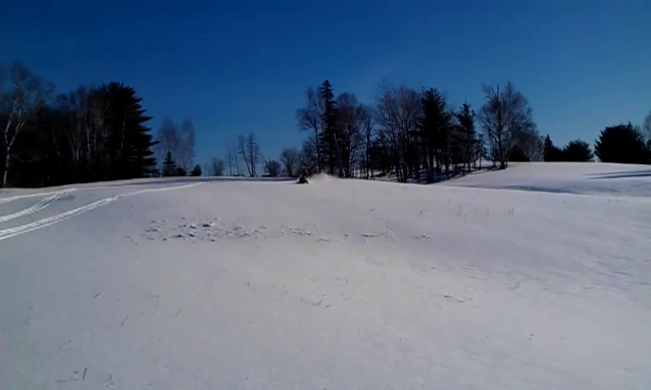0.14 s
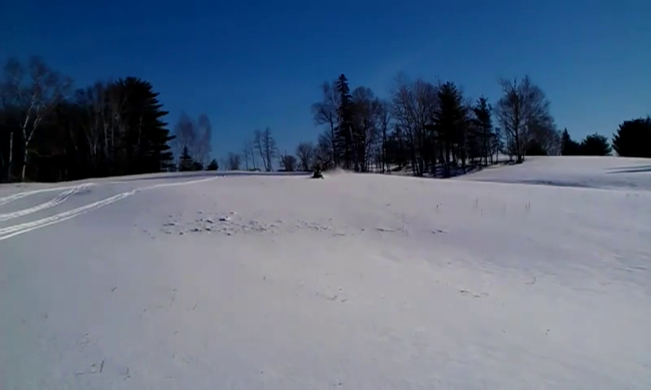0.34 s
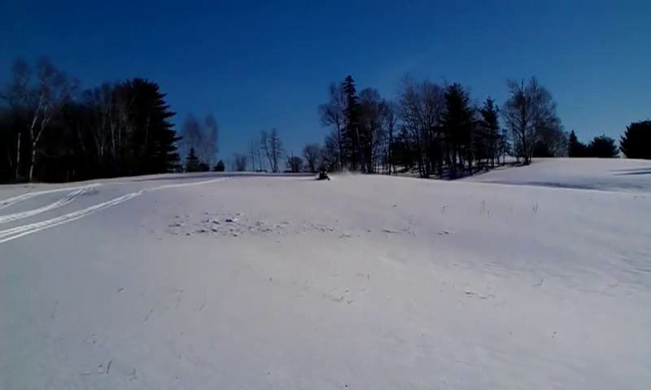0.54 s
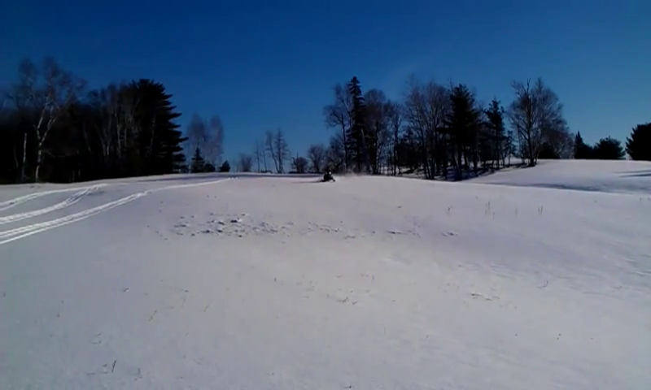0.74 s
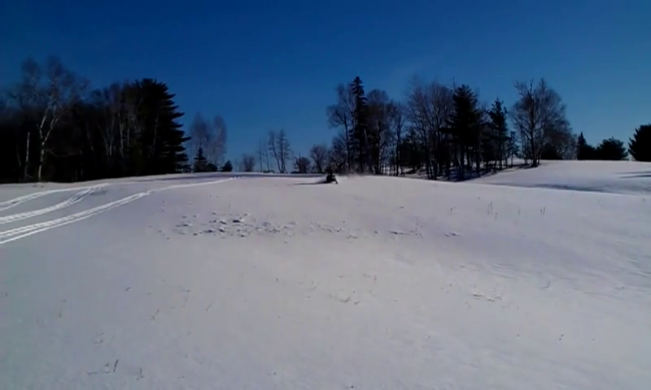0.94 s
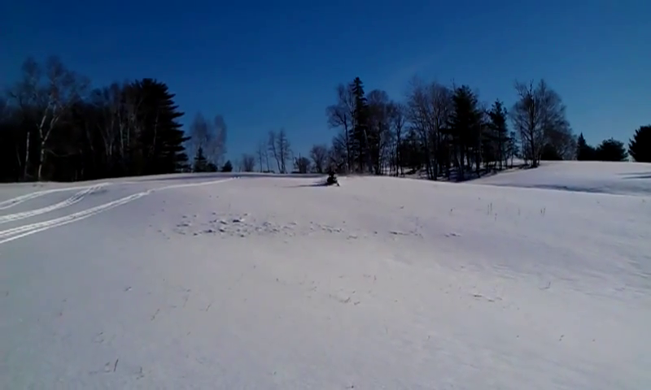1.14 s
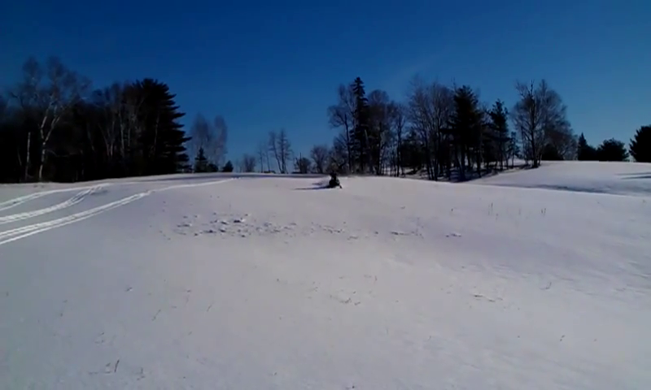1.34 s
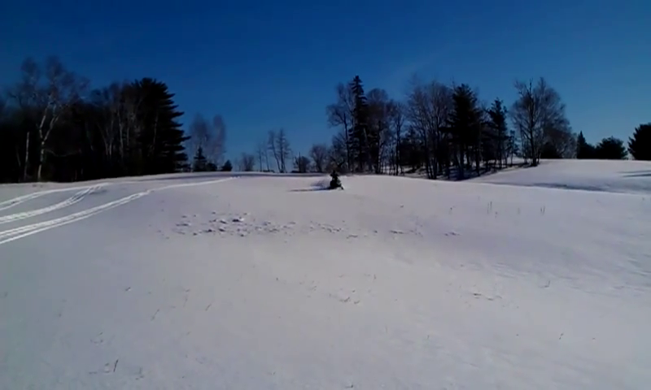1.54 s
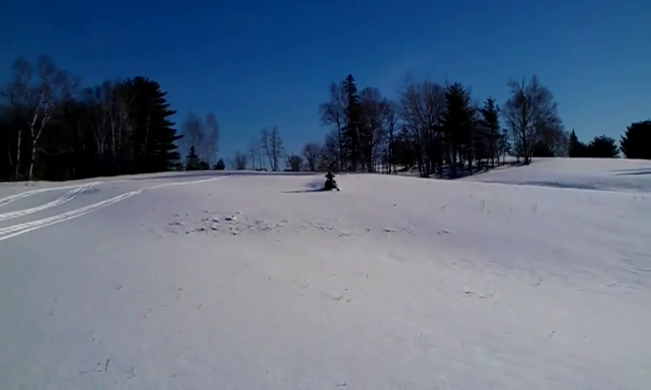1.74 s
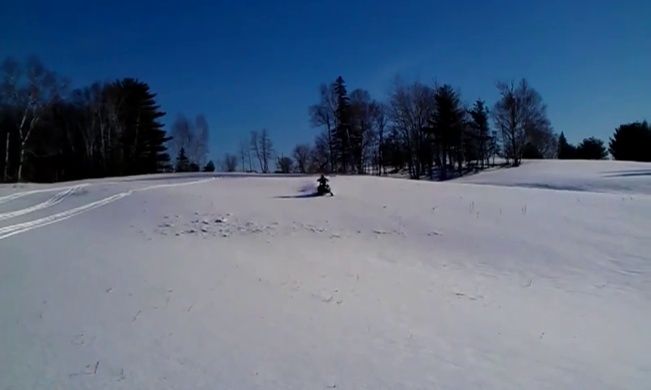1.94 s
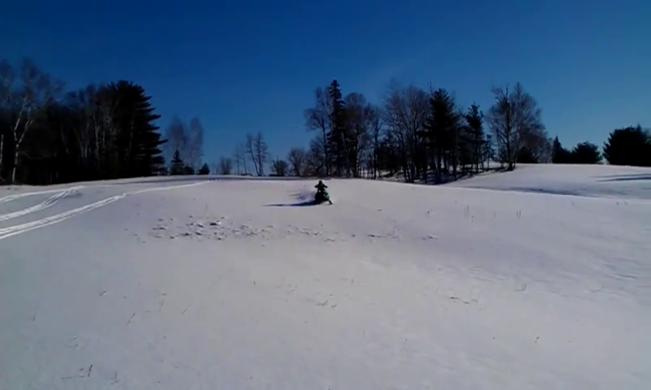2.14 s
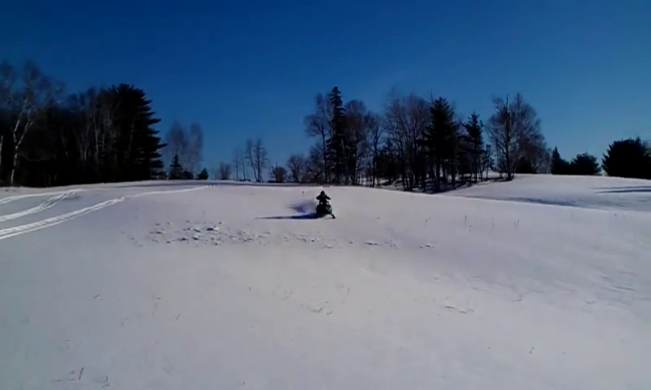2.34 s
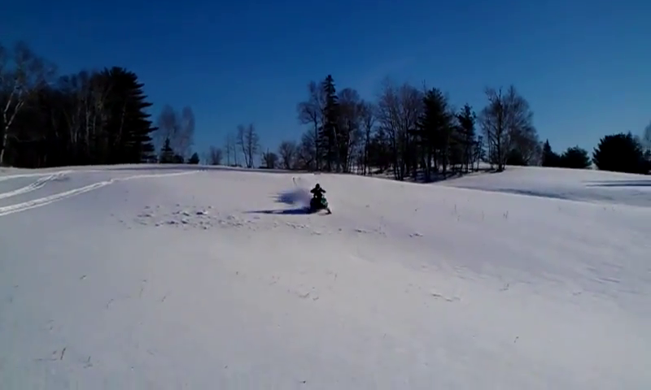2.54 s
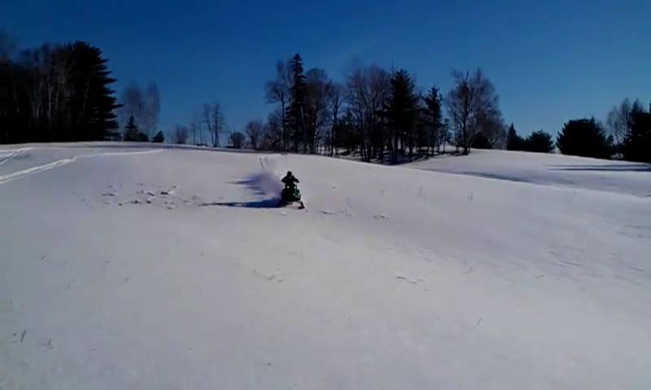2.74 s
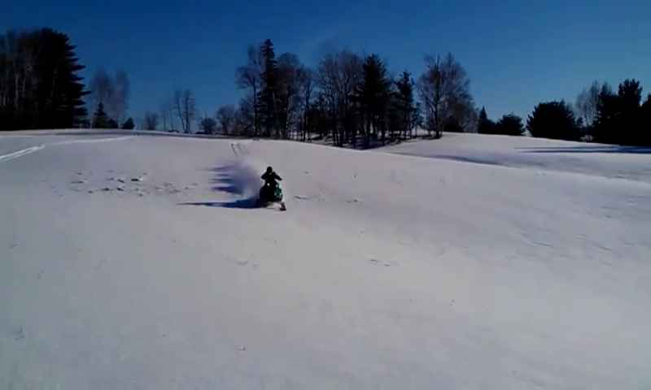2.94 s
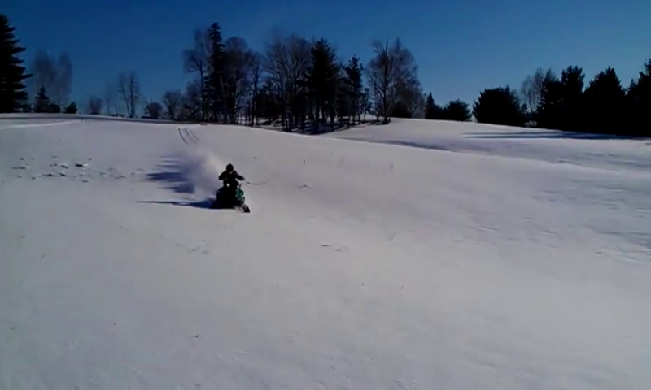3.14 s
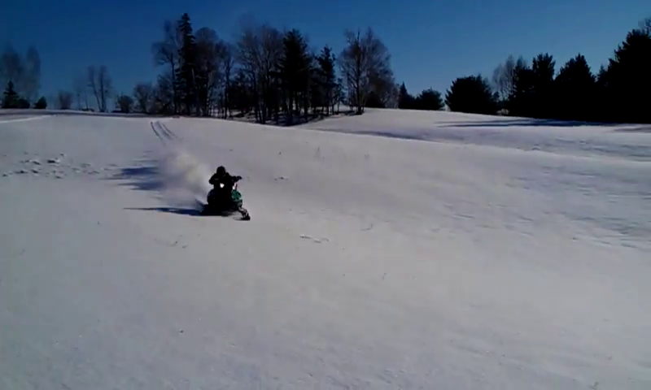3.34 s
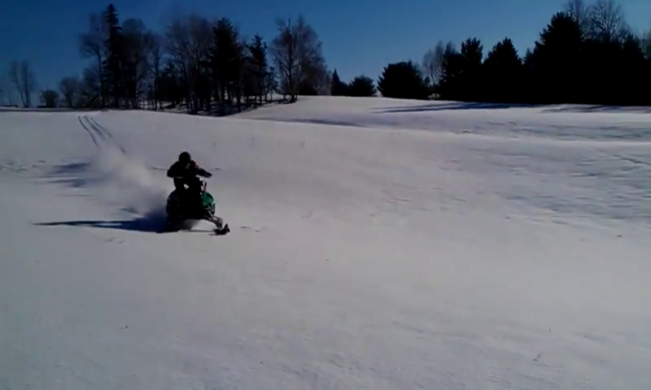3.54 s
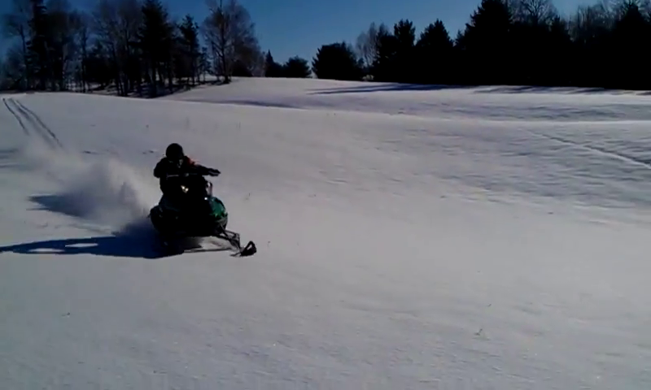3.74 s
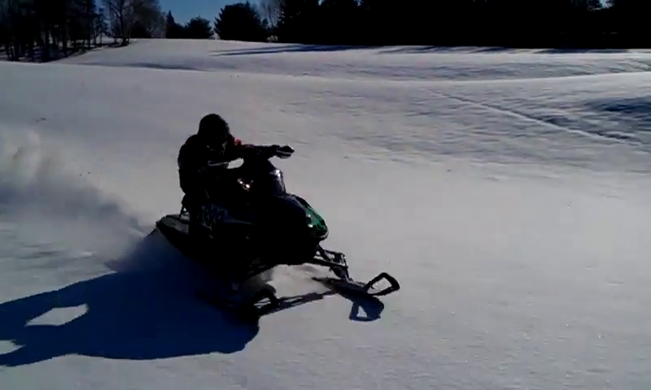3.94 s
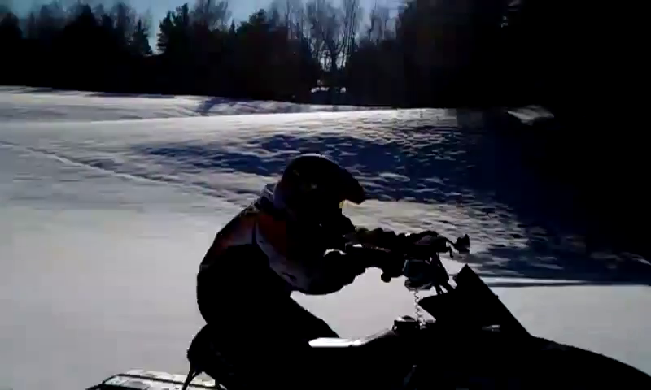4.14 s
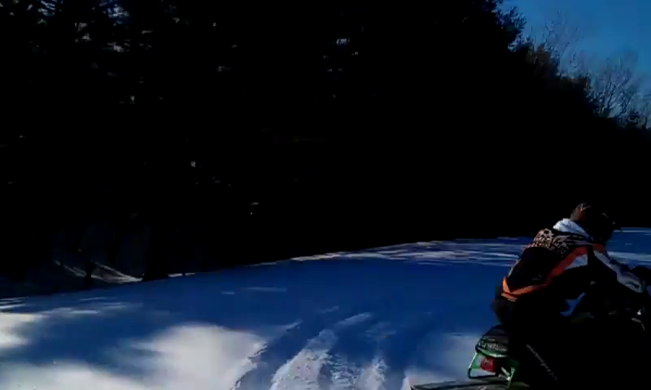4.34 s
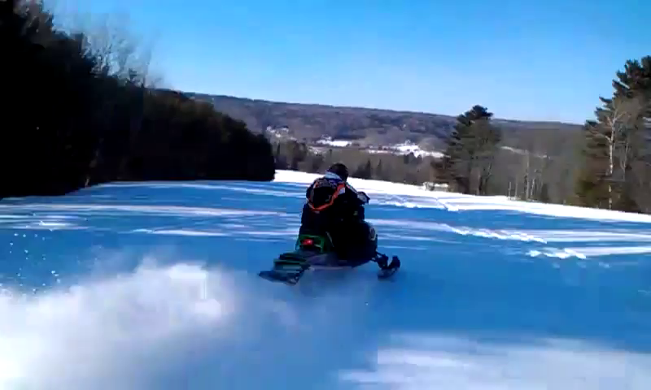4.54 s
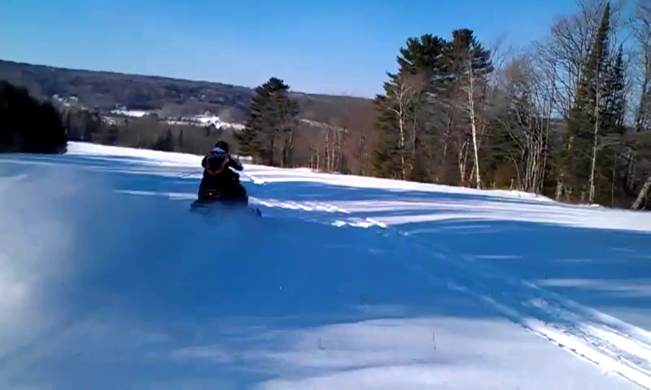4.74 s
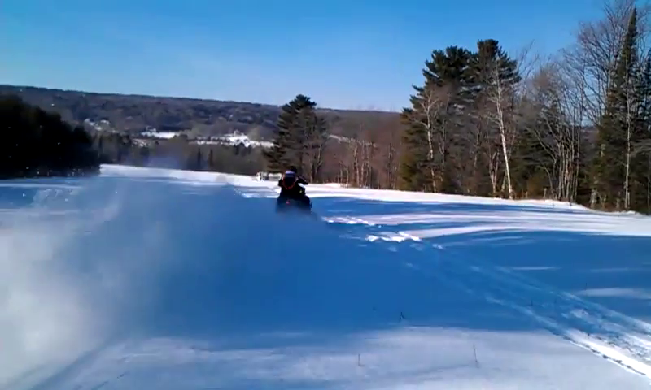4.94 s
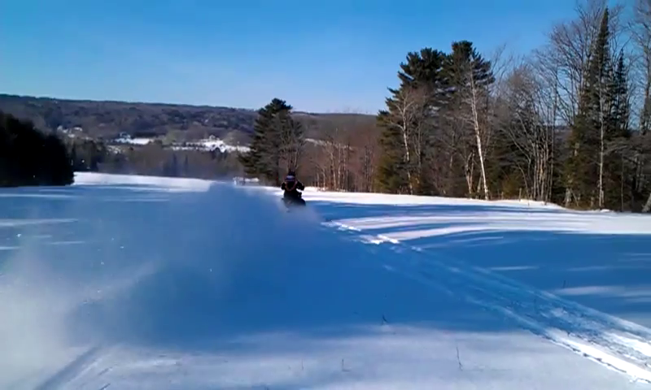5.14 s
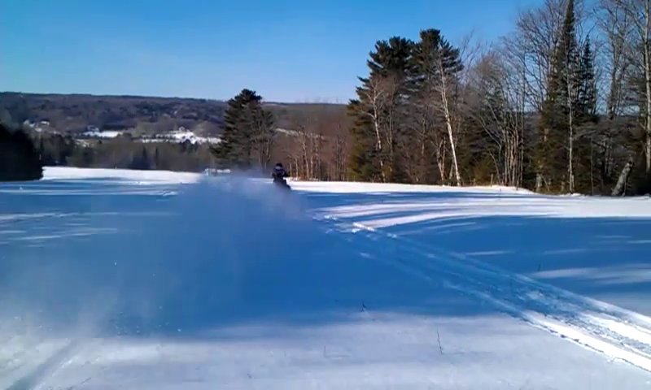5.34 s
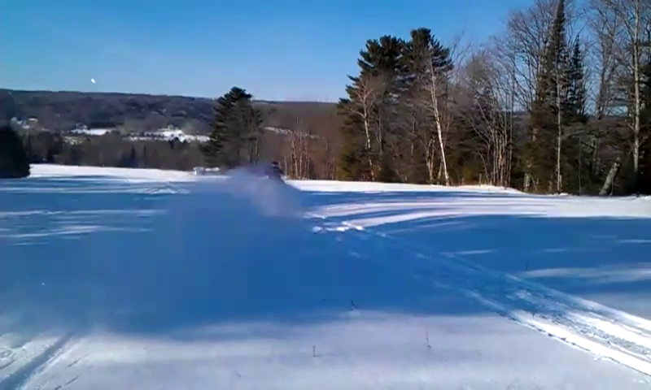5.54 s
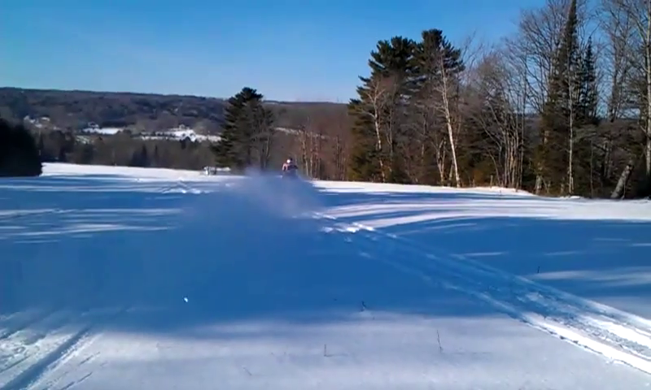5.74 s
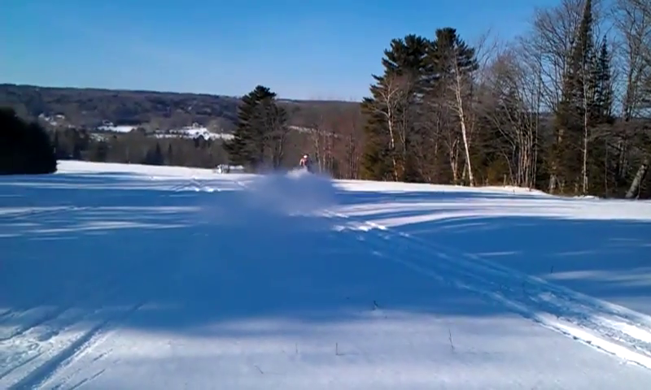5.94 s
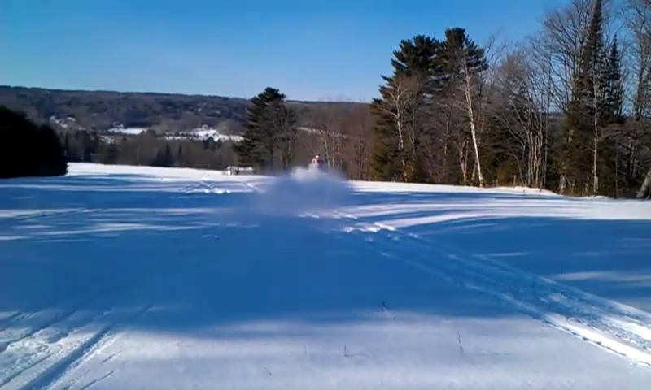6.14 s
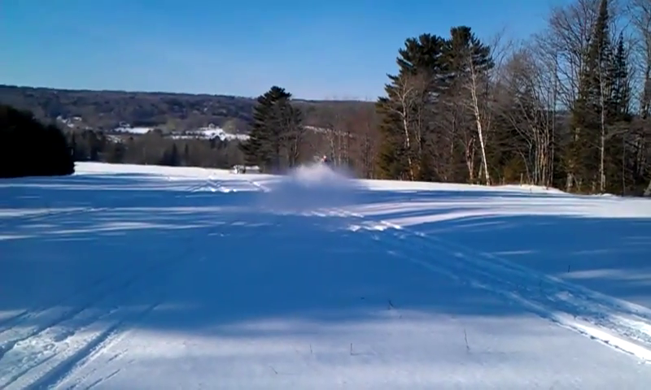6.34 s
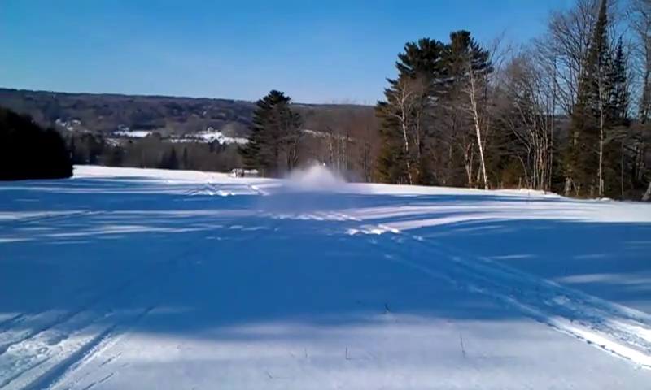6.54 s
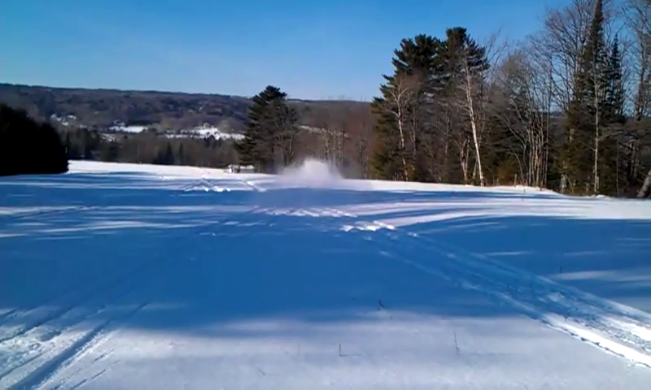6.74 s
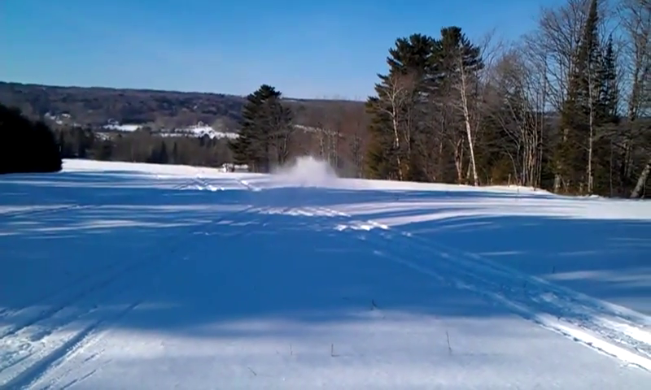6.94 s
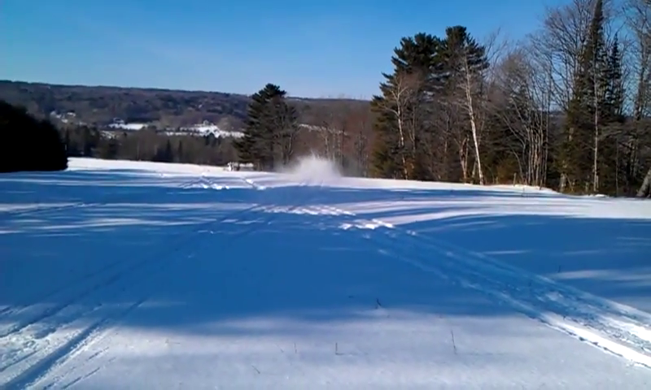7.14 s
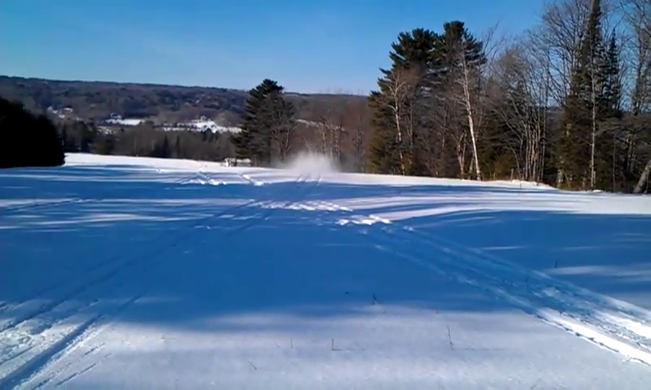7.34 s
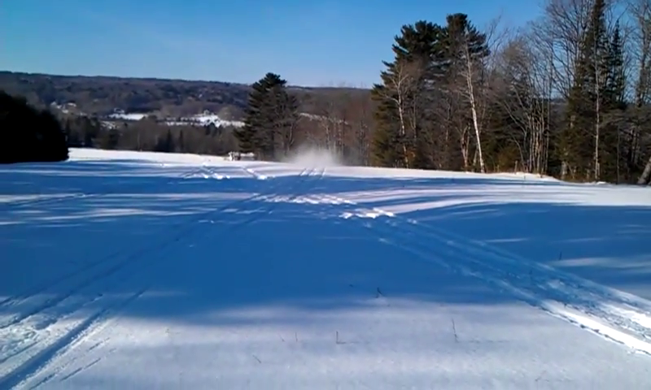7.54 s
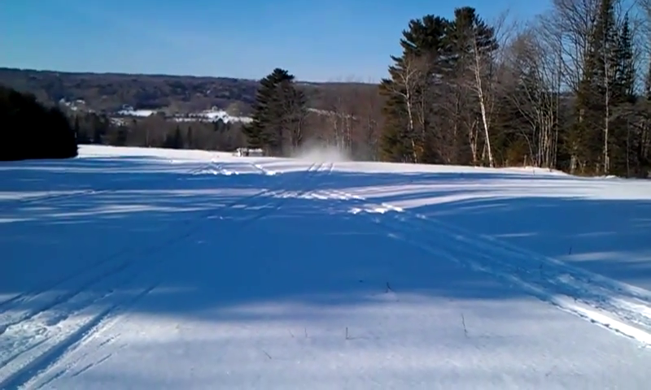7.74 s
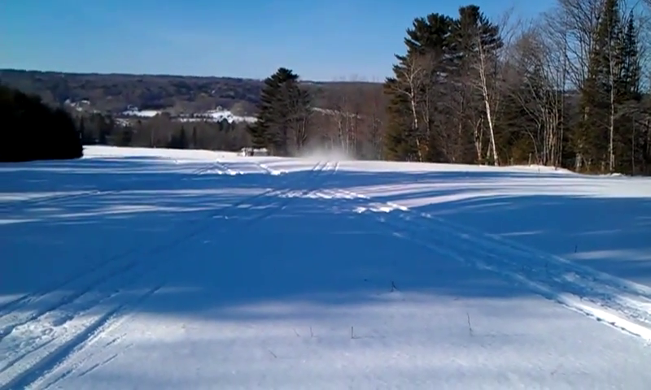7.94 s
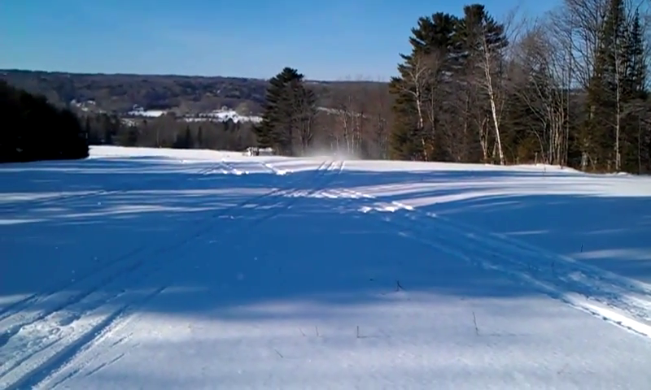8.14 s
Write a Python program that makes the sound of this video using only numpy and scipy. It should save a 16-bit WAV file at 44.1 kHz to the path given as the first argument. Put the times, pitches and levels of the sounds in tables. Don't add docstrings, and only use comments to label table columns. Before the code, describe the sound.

Outdoors on an open snowy field, one microphone is buffeted by low wind puffs. Far ahead a two-stroke snowmobile blips and stutters, then holds a raspy full-throttle scream as it approaches. It rushes by within a few metres, pitch falling sharply, with a brief spray of snow and track rumble. Behind, the throttle drops, surges once and sinks into a fading, duller burble.

```python
import sys
import numpy as np
from scipy import signal
from scipy.fft import rfft, irfft, next_fast_len
from scipy.io import wavfile
from scipy.ndimage import uniform_filter1d

SR = 44100
rng = np.random.default_rng(int(sys.argv[2]) if len(sys.argv) > 2 else 0)


def level_to_linear(level):
    exponent = np.asarray(level, float) / 20
    return 10 ** exponent


def store_pcm(level_fs):
    pcm = np.round(np.clip(level_fs, -1, 1) * 32767).astype(np.int16)
    wavfile.write(sys.argv[1], SR, np.atleast_2d(pcm).T)


N = 361355

# time in seconds, level in dB.
WIND_LEVEL = [(0.0, -42), (0.2, -35.5), (0.5, -39), (0.72, -53), (0.93, -43.5), (1.6, -45.5), (2.07, -41),
              (2.33, -46), (2.55, -38.5), (3.2, -69), (4.05, -63), (4.31, -42), (4.55, -61), (5.11, -42.5),
              (5.95, -59.5), (7.12, -62.5), (7.69, -51.5), (8.19, -56.5)]
# frequency in Hz, level in dB per Hz.
BUFFET_COLOUR = [(12, -30), (25, -10), (50, 3.5), (110, -1), (200, -11), (350, -11.5), (600, -15.5),
                 (1200, -90)]
# time in seconds, peak in dB.
EDDIES = [(0.055, -28), (0.094, -22), (0.13, -20), (0.139, -17), (0.204, -22), (0.228, -22), (0.252, -15.5),
          (0.301, -15.5), (0.37, -17.5), (0.386, -14), (0.463, -14.5), (0.507, -18), (0.622, -15.5),
          (0.638, -18), (0.691, -21.5), (0.887, -24), (0.922, -18), (1.4, -17.5), (1.413, -16.5),
          (1.453, -22), (1.684, -25), (1.807, -36), (1.882, -27), (1.943, -15), (2.009, -20), (2.043, -33),
          (2.573, -21), (2.622, -14.5), (2.709, -17)]
# time in seconds, level in dB.
SELF_NOISE_LEVEL = [
    (0, -70),
    (6.7, -70),
    (7.0, -61),
]
# frequency in Hz, level in dB per Hz.
SPRAY_COLOUR = [(300, -30), (450, -5), (560, 3), (720, -4), (1000, -24)]
# time in seconds, lug rate at the sled in Hz, tone in dB.
LUGS = [(2.4, 279.4, -46), (3.2, 315.8, -51), (3.9, 321.8, -36.5), (4.3, 345.6, -33), (4.52, 330.4, -25.5),
        (4.75, 344.7, -30), (5.1, 321.7, -34), (5.6, 285, -44), (5.9, 284, -52), (6.35, 316.9, -39),
        (6.6, 322, -42.5), (7.08, 283, -50.5), (7.6, 242.8, -73)]
# frequency in Hz, level in dB per Hz.
RUMBLE_COLOUR = [(35, -59), (70, -21), (150, -10), (300, -0.5), (520, -5), (700, -10), (1100, -37)]
# centre in seconds, length in seconds, tone in dB, overtone in dB.
CHAIN_SWELLS = [
    (5.6, 0.13, -29.5, -49),
    (7.199, .16, -56, -50),
    (7.442, 0.19, -42, -56),
]
# start in seconds, crank turns aimed at in Hz, lag in seconds.
THROTTLE_MOVES = [(0.0, 112, 0.15), (.08, 90.24, .12), (.22, 150.1, 0.33), (.47, 115.6, 0.056),
                  (.55, 165, 0.41), (.71, 138, .08), (.81, 133.5, .04), (.9, 100, .11), (1.08, 150, .45),
                  (1.17, 123.9, .12), (1.25, 190, 0.44), (1.37, 141.7, 0.39), (4.98, 101.4, 0.15),
                  (5.46, 114.2, .13), (5.66, 106.9, 0.16), (5.9, 198.6, 1.17), (6.24, 142.4, 0.089),
                  (6.55, 139.1, 0.19), (6.73, 99.3, 0.14), (7.1, 90.1, 0.59), (7.981, 102.5, 0.42)]
# centre in seconds, length in seconds, whine loss in dB.
MISFIRE_EVENTS = [
    (0.165, 0.051, 6),
    (0.494, 0.027, 6.5),
    (.945, 0.019, 4.5),
    (1.05, 0.016, 6),
    (5.354, 0.012, 7.5),
    (5.46, 0.0096, 1.5),
    (5.736, 0.0096, 6),
]
# time in seconds, roar in dB.
ROAR_LEVEL = [(0, -24), (.45, -21.5), (.65, -22.5), (.8, -21), (1.3, -20), (1.55, -19.5), (2.1, -21.5),
              (2.45, -18), (3.2, -19.5), (3.6, -17), (4.25, -21.5), (4.6, -19.5), (4.93, -18.5),
              (5.05, -18), (5.62, -16.5), (5.78, -18.5), (6.4, -22), (6.7, -27), (8.19, -23)]
# multiple of crank turns, level in dB.
ORDERS_OVER_RISE = [(1, -23), (2, -10.5), (3, -22), (4, -2), (5, -20), (6, 4), (7, -30), (8, -17), (9, -14),
                    (10, -7), (11, -3), (12, -2), (13, -7), (14, -2), (15, -6), (16, 2), (17, 3.5),
                    (18, -4), (19, -24), (20, -6), (21, -1), (22, 2.5)]
ORDERS_AHEAD = [(1, -25.5), (2, -16), (3, -18.5), (4, -3.5), (5, -11), (6, 6.5), (7, -27), (8, -10),
                (9, -56), (10, 3), (11, -7), (12, -3), (13, -19), (14, -3), (15, -2), (16, 0.5), (17, 1),
                (18, -7), (19, -28), (20, -7), (21, -33), (22, -2)]
ORDERS_CLOSE = [(1, -20), (2, -18), (3, -32), (4, -6.5), (5, -4), (6, -0.5), (7, -27), (8, -3), (9, -27),
                (10, 6), (11, -6), (12, 1.5), (13, -15), (14, -5), (15, -3), (16, -0.5), (17, 1.5),
                (18, -2.5), (19, -14), (20, -6), (21, -35), (22, -2.5)]
ORDERS_JUST_PAST = [(1, -29), (2, -6), (3, 0), (4, -2), (5, -25), (6, 3.5), (7, -16), (8, -3), (9, -16),
                    (10, 1), (11, -6), (12, 0), (13, -6), (14, -25), (15, -17), (16, -9), (17, -12),
                    (18, 1.5), (19, -11), (20, -2), (21, -1), (22, 1)]
ORDERS_LEAVING = [(1, -32), (2, -4.5), (3, -5), (4, -5), (5, -25), (6, 0.5), (7, -12), (8, 4.5), (9, -3.5),
                  (10, 0), (11, -6.5), (12, -3), (13, 3.5), (14, 2.5), (15, 2.5), (16, 1), (17, 2.5),
                  (18, -8), (19, -2.5), (20, -7), (21, -4), (22, -8)]
# frequency in Hz, level in dB per Hz.
INTAKE_COLOUR = [(250, -54), (420, -75), (600, -19.5), (800, -7.5), (1150, -13.5), (1400, -9.5), (1600, -6),
                 (2500, -4.5), (3300, -8), (3900, -12), (4500, -18.5), (4900, -68)]
EXHAUST_COLOUR = [(250, -22.5), (420, -1.5), (600, -10), (780, 1), (1100, 0), (1400, -0.5), (2050, 1),
                  (2600, -3), (3300, -4), (3900, -7), (4500, -14.5), (4900, -72)]
# frequency in Hz, level in dB per Hz.
WHINE_AHEAD_COLOUR = [(4100, -26.5), (4500, -13.5), (5000, -3.5), (5700, -4.5), (6800, -6.5), (7500, -2),
                      (8000, 0), (8700, -5.5), (9500, -11), (10500, -42), (13000, -63)]
WHINE_BEHIND_COLOUR = [(4100, -44), (4500, -11.5), (5100, -3), (5800, -6), (6900, -8), (7500, -3.5),
                       (8000, 0), (8700, -3), (9500, -7.5), (10500, -21), (13000, -71)]
# frequency in Hz, level in dB per Hz.
HISS_COLOUR = [(9000, -7.5), (10300, 0), (11000, -5), (11600, -6.5), (12200, -6.5), (13200, -8),
               (16500, -9), (17200, -12)]
# frequency in Hz, level in dB.
FAR_CARRY = [(200, -18.5), (560, -10), (700, -0.5), (850, -3.5), (1050, -4), (1400, -3.5), (1600, 2),
             (2350, 0.5), (2650, -3.5), (4500, -3.5), (6000, -25)]
# time
# in seconds, centre in Hz, depth in dB.
PORT_DIP_FIRST = [(0, 4510, 20), (1.9, 4460, 22), (2.2, 4600, 16), (2.8, 4740, 20), (3.05, 4750, 0),
                  (4.0, 5050, 0), (4.15, 5150, 12), (4.3, 5200, 0), (4.65, 5250, 0), (4.82, 5220, 26),
                  (5.0, 5200, 0)]
PORT_DIP_SECOND = [(0, 3420, 6), (1.9, 3400, 8), (2.1, 3700, 0), (2.6, 4100, 2), (2.95, 4050, 12),
                   (3.2, 3820, 16), (3.4, 4000, 10), (3.75, 4120, 16), (4.1, 4250, 10), (4.4, 3980, 10),
                   (4.65, 4600, 16), (4.8, 4200, 26), (4.95, 4180, 26), (5.1, 4550, 12), (8.19, 4420, 12)]
HIGH_DIP = [(0, 10750, 24), (1.3, 10750, 22), (1.9, 11100, 9), (2.5, 11000, 0)]
# time in seconds, centre in Hz, depth in dB.
GROUND_DIP = [(0, 1167, -1.5), (.8, 1350, 4.5), (1.8, 1349, 2.5), (2.5, 1349, 1), (3.1, 2902, 0.5),
              (3.5, 2997, 2.5), (3.95, 3006, -0.5), (4.2, 1987, -0.5), (4.55, 1048, 1), (4.85, 749.7, 9.5),
              (5.05, 600, -5)]

PASS_S, TURN_S, SPEED_M_S, MISS_M, SOUND_M_S = 4.265, 0.24, 24, 2.4, 343
NEAR_M = 4.38
CREST_M, CREST_BEHIND_M, CREST_SOFT_M = 67, 66, 9.4
EARLY_M, CLOSE_M, LEAVING_M, SWING_M = 51, 23.8, 26.6, 8.3
START_HZ, FULL_HZ = 98.7, 142
REVS_DB, WHINE_REVS_DB, CLEAN_REVS_DB, HISS_REVS_DB, BASS_REVS_DB = 31.5, 11, 28.5, 15, 56
MISFIRE_ROAR_SHARE = 0.68
WHINE_DB, WHINE_AHEAD_DB_M, WHINE_BEHIND_DB_M = 5.5, 0.0476, 0.1172
HISS_DB, HISS_LEAST_DB, HISS_SPREADS, HISS_SPREADS_AHEAD = -2.5, -16, 0.7, 0.45
BASS_AHEAD_DB, BASS_BEHIND_DB, BASS_SPREADS, BASS_LEAD_S, BASS_TURN_S = 2.5, 20, 1, 0.1, 0.065
CLEAN_AHEAD_DB, CLEAN_BEHIND_DB, CLEAN_LEAST_DB = 3.5, 0, -9
CLEAN_PULL_DB, PULL_AHEAD_DB, PULL_RATE = 2, 2, 0.53
CLEAN_IDLE_DB = 3
CLEAN_PASS_DB, CLEAN_PASS_S, CLEAN_RISE_DB = -4, .2, -2
HIGH_ORDERS_DB = -3.5
FAR_ODD_DB = -2
THROB_SMEAR = .4
RUMBLE_DB, RUMBLE_LAG_S, RUMBLE_SPREADS, RUMBLE_AHEAD_DB = -14.5, 0.11, 1.4, -6
CHAIN_TEETH = 5.8
EDDY_HZ, EDDY_HZ_PER_DB, TRAIL_S, TRAIL_DB = 282, 5.0, 0.0128, -7
TICK_S, TICK_DB, TICK_HZ, TICK_LENGTH_S = 8.175, -19.5, 9600, 0.0002
SPRAY_S, SPRAY_LENGTH_S, SPRAY_DB = 4.4, 0.21, -34
SCATTER_DB = 2.8
GAP_HZ, GAP_WIDTH_HZ, GAP_DB, GAP_BELOW = 4200, 1400, 22, 1.1
AIR_FROM_HZ, AIR_DB_M_KHZ = 12700, 0.35
DUST_FROM_HZ, DUST_FROM_M, DUST_DB_M_KHZ, TRAIL_DB_M_KHZ = 7740, 60, 0.25, 0.035
PORT_WIDTH_HZ, HIGH_DIP_WIDTH_HZ, GROUND_WIDTH = 95, 330, 0.23
SLED_FROM_HZ, TOP_HZ = 62, 17200
CEILING_DB, CEILING_S, CEILING_HOLD = -15.6, .05, .75


def unit(x):
    return x / np.sqrt(np.mean(x ** 2) + 1e-20)


def curves(rows):
    s, *cols = np.transpose(rows)
    return [np.interp(np.arange(N) / SR, s, c) for c in cols]


def wobble(rate):
    knots = rng.standard_normal(int(N * rate / SR) + 4)
    return np.interp(np.arange(N) * rate / SR, np.arange(len(knots)), knots)


def step_up(x):
    return .5 + .5 * np.tanh(x)


def mix(a, b, share):
    return (1 - share) * a + share * b


def coloured(x, points):
    m = next_fast_len(N + 8192)
    f, db = np.transpose(points)
    gain = level_to_linear(np.interp(np.log(np.fft.rfftfreq(m, 1 / SR) + 1), np.log(f + 1), db))
    return unit(irfft(rfft(x, m) * gain, m)[:N])


def random_patches(shape, bins, frames):
    field = uniform_filter1d(rng.standard_normal(shape), size=bins, axis=0)
    return unit(uniform_filter1d(field, size=frames, axis=1))


def patchy(depth_db):
    z = signal.stft(rng.standard_normal(N + 512), nperseg=512)[2]
    field = random_patches(z.shape, bins=5, frames=12)
    return signal.istft(z * level_to_linear(depth_db * field), nperseg=512)[1][:N]


def order(k, angle, flicker_db, smear):
    level = level_to_linear(flicker_db * wobble(7))
    blur = smear * np.sqrt(k) * wobble(40)
    return level * np.sin(k * angle + blur + rng.uniform(0, 2 * np.pi))


def offset(lag_s=0):
    return SPEED_M_S * (np.arange(N) / SR - PASS_S - lag_s)


def doppler():
    return 1 / (1 + SPEED_M_S / SOUND_M_S * offset() / np.hypot(offset(), MISS_M))


def spread_db(lag_s=0):
    return 10 * np.log10(1 + (offset(lag_s) / NEAR_M) ** 2)


def wind():
    buffet_db, = curves(WIND_LEVEL)
    air = level_to_linear(buffet_db + 2.5 + 4.6 * wobble(30)) * coloured(rng.standard_normal(N), BUFFET_COLOUR)
    t = np.arange(-SR // 20, SR // 20) / SR
    air = np.pad(air, len(t) // 2)
    eddies = list(EDDIES) + [(s + TRAIL_S, db + TRAIL_DB) for s, db in EDDIES]
    for (s, db), (turn, chance) in zip(eddies, rng.uniform(0, 1, (len(eddies), 2))):
        hz = (EDDY_HZ + EDDY_HZ_PER_DB * db) * (0.88 + 0.55 * chance)
        push = np.exp(-(t * hz / 0.35) ** 2) * np.cos(2 * np.pi * (0.86 * hz * t + turn))
        air[round(s * SR):][:len(t)] += level_to_linear(db) * push
    return air[len(t) // 2:][:N]


def tick():
    t = np.arange(N) / SR - TICK_S
    return level_to_linear(TICK_DB) * np.exp(-(t / TICK_LENGTH_S) ** 2) * np.sin(2 * np.pi * TICK_HZ * t)


def spray():
    swell = np.exp(-((np.arange(N) / SR - SPRAY_S) / SPRAY_LENGTH_S) ** 2)
    return level_to_linear(SPRAY_DB + wobble(22)) * swell * coloured(patchy(depth_db=1.5), SPRAY_COLOUR)


def chain():
    t = np.arange(N) / SR
    angle = 2 * np.pi * CHAIN_TEETH * np.cumsum(curves(LUGS)[0] * doppler()) / SR
    tone, overtone = np.zeros(N), np.zeros(N)
    for s, length, tone_db, overtone_db in CHAIN_SWELLS:
        swell = np.exp(-((t - s) / length) ** 2)
        tone += level_to_linear(tone_db + 3) * swell
        overtone += level_to_linear(overtone_db + 3) * swell
    tone = tone * order(1, angle, flicker_db=2.5, smear=1.5)
    return tone + overtone * order(2, angle, flicker_db=2.5, smear=.7)


def track():
    lug_hz, tone_db = curves(LUGS)
    ahead = 1 - step_up(offset() / NEAR_M)
    rumble_db = RUMBLE_DB - RUMBLE_SPREADS * spread_db(RUMBLE_LAG_S) + RUMBLE_AHEAD_DB * ahead
    t = np.arange(N) / SR
    heard = np.clip((t - LUGS[0][0]) / 0.33, 0, 1) * np.clip((LUGS[-1][0] - t) / 0.23, 0, 1)
    angle = np.pi * np.cumsum(lug_hz * doppler()) / SR
    hum = level_to_linear(tone_db + 4.0) * order(2, angle, flicker_db=4.5, smear=0.59)
    thump = level_to_linear(1.2 * (rumble_db + 23.5) - 35.0) * order(0.97, angle, flicker_db=2.0, smear=1.0)
    rumble = level_to_linear(rumble_db - 8.0 + 0.74 * wobble(15)) * coloured(patchy(depth_db=4.0), RUMBLE_COLOUR)
    return heard * (hum + thump + rumble)


def crank():
    t, turns = np.arange(N) / SR, np.full(N, float(START_HZ))
    for s, aim, lag in THROTTLE_MOVES:
        i = max(round(s * SR), 0)
        turns[i:] = aim + (turns[i] - aim) * np.exp(-(t[i:] - t[i]) / lag)
    return uniform_filter1d(turns, size=1200)


def firing_evenness(true_hz, rear, far):
    clean_db = mix(CLEAN_AHEAD_DB, CLEAN_BEHIND_DB, rear) - CLEAN_REVS_DB * (1 - true_hz / FULL_HZ)
    clean_db = np.maximum(clean_db, CLEAN_LEAST_DB)
    climb = np.gradient(np.log(true_hz)) * SR
    pull = np.clip(uniform_filter1d(climb, size=4000) / PULL_RATE, 0, 1)
    clean_db = clean_db + mix(PULL_AHEAD_DB, CLEAN_PULL_DB, rear) * pull
    falling = -uniform_filter1d(climb, size=2600)
    clean_db = clean_db - 7 * np.clip((falling - .45) / .5, 0, 1)
    clean_db = clean_db + far * mix(CLEAN_RISE_DB, CLEAN_IDLE_DB, rear)
    return clean_db + CLEAN_PASS_DB * np.exp(-(offset() / SPEED_M_S / CLEAN_PASS_S) ** 2)


def controls(true_hz, rear):
    t, metres, slack = np.arange(N) / SR, np.abs(offset()), 1 - true_hz / FULL_HZ
    miss_db = sum(db * np.exp(-((t - s) / length) ** 2) for s, length, db in MISFIRE_EVENTS)
    level_db = curves(ROAR_LEVEL)[0] - REVS_DB * slack
    roar_db = level_db - MISFIRE_ROAR_SHARE * miss_db
    air_db = metres * mix(WHINE_AHEAD_DB_M, WHINE_BEHIND_DB_M, rear)
    whine_db = level_db + WHINE_DB - air_db - WHINE_REVS_DB * slack - miss_db
    hiss_loss_db = mix(HISS_SPREADS_AHEAD, HISS_SPREADS, rear) * spread_db() + HISS_REVS_DB * slack
    hiss_db = np.maximum(HISS_DB - hiss_loss_db, HISS_LEAST_DB)
    far = step_up((metres - np.where(t < PASS_S, CREST_M, CREST_BEHIND_M)) / CREST_SOFT_M)
    exhaust = step_up((t - PASS_S + BASS_LEAD_S) / BASS_TURN_S)
    bass_behind_db = BASS_BEHIND_DB - BASS_SPREADS * spread_db() - BASS_REVS_DB * slack
    bass_db = mix(BASS_AHEAD_DB, bass_behind_db, exhaust)
    return roar_db, whine_db, hiss_db, far, bass_db, firing_evenness(true_hz, rear, far)


def strength(k, table, revs):
    multiple, db = np.transpose(table[(k + 1) % 2::2])
    return np.interp(k * revs, multiple, db)


def seen_db(k, revs, rear):
    def beyond(m):
        return step_up((np.abs(offset()) - m) / SWING_M)

    def level(table):
        return strength(k, table, revs)

    ahead = mix(level(ORDERS_CLOSE), level(ORDERS_AHEAD), beyond(CLOSE_M))
    ahead = mix(ahead, level(ORDERS_OVER_RISE), beyond(EARLY_M))
    behind = mix(level(ORDERS_JUST_PAST), level(ORDERS_LEAVING), beyond(LEAVING_M))
    return mix(ahead, behind, rear)


def low_orders(angle, true_hz, rear, far, bass_db, clean_db):
    turns_hz = true_hz * doppler()
    revs = np.minimum(true_hz / FULL_HZ + 0.074, 1)
    blur = (.07 + .05 * far) * level_to_linear(-.8 * clean_db)
    total = np.zeros(N)
    for k in range(1, 23):
        carry_db = 0.76 * np.interp(k * turns_hz, *np.transpose(FAR_CARRY)) + FAR_ODD_DB * (k % 2)
        level_db = mix(seen_db(k, revs, rear), carry_db - 3.5, far)
        if k < 3:
            level_db = level_db + bass_db
        smear = blur + THROB_SMEAR * rear * (k < 3)
        total += level_to_linear(level_db) * order(k, angle, flicker_db=2.5 + 2.95 * far, smear=smear)
    return unit(total)


def buzz(angle, first, count):
    cycle, k = np.linspace(0, 2 * np.pi, 4097), np.arange(first, first + count)[:, None]
    size = level_to_linear(-9 * (k % 2) + 3 * rng.standard_normal((2, count, 1)))
    shapes = (size * np.sin(k * cycle + rng.uniform(0, 2 * np.pi, (2, count, 1)))).sum(axis=1)
    turn, place = wobble(9), (angle + .012 * wobble(40)) % (2 * np.pi)
    first_shape, second_shape = [np.interp(place, cycle, shape) for shape in shapes]
    return unit(np.cos(turn) * first_shape + np.sin(turn) * second_shape)


def engine():
    rear = step_up((np.arange(N) / SR - PASS_S) / TURN_S)
    true_hz = crank()
    roar_db, whine_db, hiss_db, far, bass_db, clean_db = controls(true_hz, rear)
    angle = 2 * np.pi * np.cumsum(true_hz * doppler() * (1 + 0.002016 * wobble(25))) / SR
    low = low_orders(angle, true_hz, rear, far, bass_db, clean_db)
    high = unit(sum(level_to_linear(-9 * (k % 2)) * order(k, angle, flicker_db=3, smear=0.17) for k in range(23, 66)))
    beat = 1 + 0.14 * np.cos(2 * angle) + 0.031 * np.cos(angle)
    rough = unit(beat * patchy(depth_db=1.6))

    def sided(x, front, back):
        return np.sqrt(1 - rear) * coloured(x, front) + np.sqrt(rear) * coloured(x, back)

    share = level_to_linear(clean_db)
    noise = sided(rough + level_to_linear(clean_db - 3.5 - 3.5 * far) * high, INTAKE_COLOUR, EXHAUST_COLOUR)
    roar = (share * low + noise) / np.sqrt(1 + share ** 2)
    roar = mix(roar, coloured(roar, FAR_CARRY), far)
    whine = rough + level_to_linear(clean_db - 7.5 - 1.4 * far) * high
    whine = sided(whine, WHINE_AHEAD_COLOUR, WHINE_BEHIND_COLOUR)
    hiss = unit(beat * patchy(depth_db=2.5))
    hiss = hiss + level_to_linear(clean_db + HIGH_ORDERS_DB) * buzz(angle, first=66, count=40)
    hiss = coloured(hiss, HISS_COLOUR)
    bright = whine / np.sqrt(1 + .5 * share ** 2) + level_to_linear(hiss_db + 1.4 * wobble(14)) * hiss
    return level_to_linear(roar_db) * roar + level_to_linear(whine_db + 0.11 * wobble(9)) * bright


def dip_db(path, hz, t, width_hz=0, share=0):
    s, centre, db = np.transpose(path)
    centre = np.interp(t, s, centre)
    return np.interp(t, s, db) * np.exp(-((hz[:, None] - centre) / (width_hz + share * centre)) ** 2)


def scattered(x):
    hz, t, z = signal.stft(x, SR, nperseg=1024)
    field = random_patches(z.shape, bins=4, frames=14)
    depth_db = SCATTER_DB * np.clip(hz / 2500, .15, 1)[:, None]
    patches_db = depth_db * field - .115 * depth_db ** 2
    near_gap = np.exp(-((hz - GAP_HZ) / GAP_WIDTH_HZ) ** 2)[:, None]
    loss_db = GAP_DB * near_gap * np.clip(-field - GAP_BELOW, 0, 1)
    ahead, behind = SPEED_M_S * np.maximum(PASS_S - t, 0), SPEED_M_S * np.maximum(t - PASS_S, 0)
    loss_db += AIR_DB_M_KHZ * np.outer(np.clip((hz - AIR_FROM_HZ) / 1000, 0, 1.2), ahead)
    dust = TRAIL_DB_M_KHZ * behind + DUST_DB_M_KHZ * np.maximum(behind - DUST_FROM_M, 0)
    loss_db += np.outer(np.maximum(hz - DUST_FROM_HZ, 0) / 1000, dust)
    loss_db += dip_db(GROUND_DIP, hz, t, share=GROUND_WIDTH)
    loss_db += dip_db(PORT_DIP_FIRST, hz, t, PORT_WIDTH_HZ)
    loss_db += dip_db(PORT_DIP_SECOND, hz, t, PORT_WIDTH_HZ)
    loss_db += dip_db(HIGH_DIP, hz, t, HIGH_DIP_WIDTH_HZ)
    return signal.istft(z * level_to_linear(patches_db - loss_db), SR, nperseg=1024)[1][:N]


def scene():
    sled = scattered(engine()) + track() + chain()
    sled = signal.sosfilt(signal.butter(4, SLED_FROM_HZ, "high", fs=SR, output="sos"), sled)
    return (sled + wind() + tick() + spray())[None]


def levelled(x):
    size = round(CEILING_S * SR)
    level_db = 10 * np.log10(np.abs(uniform_filter1d(x ** 2, size=size)) + 1e-12)
    return x * level_to_linear(-CEILING_HOLD * uniform_filter1d(np.maximum(level_db - CEILING_DB, 0), size=size))


def top_cut(x):
    return signal.sosfilt(signal.butter(12, 17200, fs=SR, output="sos"), x)


def record(dry):
    hz = np.fft.rfftfreq(N, 1 / SR)
    x = dry + level_to_linear(curves(SELF_NOISE_LEVEL)[0]) * rng.standard_normal(N)
    x = levelled(x)
    x = x / (1 + np.abs(x / .72) ** 14) ** (1 / 14)
    x = irfft(rfft(x) * (hz < TOP_HZ), N)
    return top_cut(x)


dry = scene()
out = record(dry)
store_pcm(out)
```